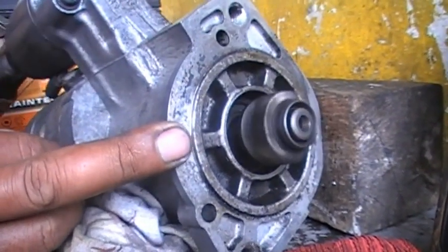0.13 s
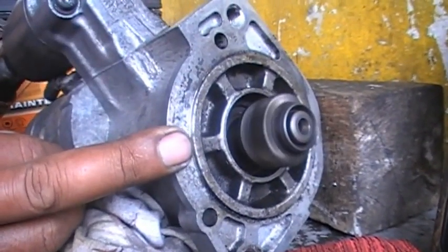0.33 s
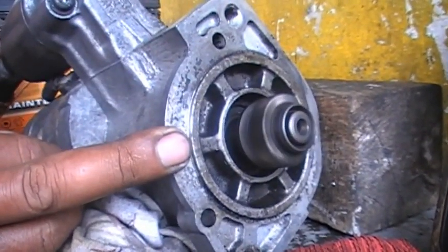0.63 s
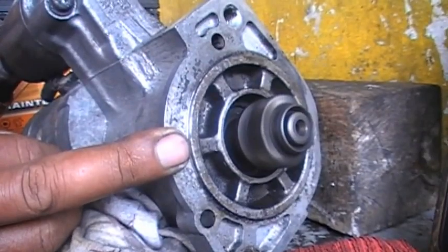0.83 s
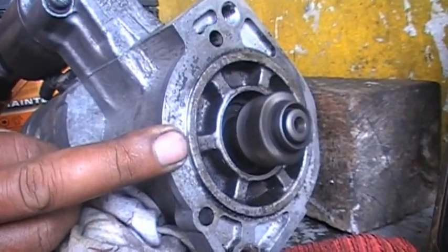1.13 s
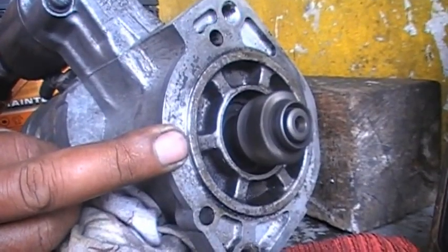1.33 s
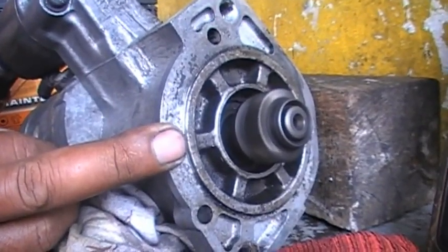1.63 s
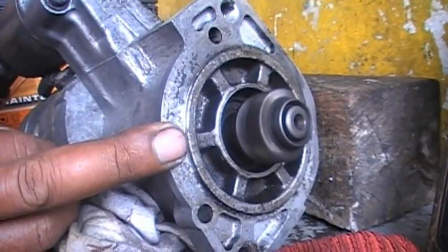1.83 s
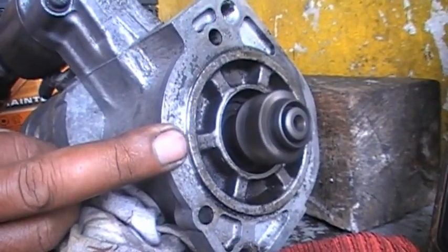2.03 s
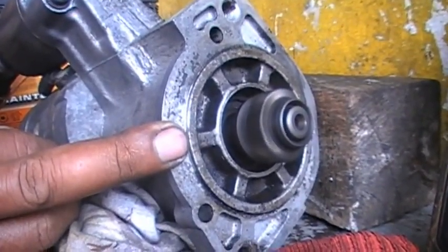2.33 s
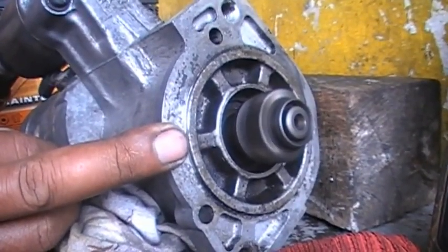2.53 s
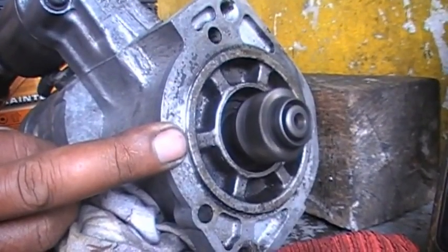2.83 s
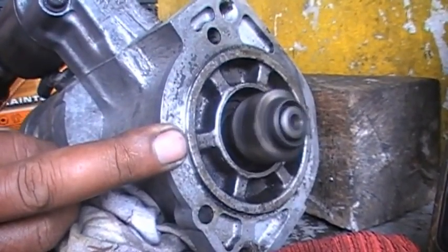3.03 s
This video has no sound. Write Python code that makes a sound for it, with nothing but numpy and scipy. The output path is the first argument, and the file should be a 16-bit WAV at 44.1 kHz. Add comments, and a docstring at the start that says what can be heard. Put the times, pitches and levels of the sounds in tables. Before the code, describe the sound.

An electric starter motor clacks into a loud, gritty whine and cuts out with a knock.

```python
"""A starter motor on a workbench. First the solenoid, an electromagnet, clunks the small drive gear out.
Then the motor spins up to a steady whine: tones from its shaft and ball bearings over the rush of
brushes and rolling balls. The shaft tones and the rush ring the cast metal housing. After about three
seconds the current is cut and the gear knocks back. Quiet workshop air lies under it all."""
import sys
import numpy as np
from scipy import signal
from scipy.fft import rfft, irfft, next_fast_len
from scipy.io import wavfile
from scipy.ndimage import uniform_filter1d, map_coordinates

SR = 44100
rng = np.random.default_rng(int(sys.argv[2]) if len(sys.argv) > 2 else 0)


def dump_mix(stems):
    """Bounce the given channels to the path in sys.argv[1] as a 16-bit WAV at rate SR."""
    frames = np.atleast_2d(stems).T  # one column per channel
    limited = np.clip(frames, -1, 1)  # hard clip at full scale
    pcm = np.round(limited * 32767).astype(np.int16)
    wavfile.write(sys.argv[1], SR, pcm)


N = 139797
T = np.arange(N) / SR


def motor():
    """One shaft speed drives the tones and the beat of the rush; all drop when the current is cut."""
    # How fast the shaft spins: time_s, speed_hz
    spin_up = [(0.12, 46.71), (0.14, 58.47), (0.16, 66.9), (0.18, 76.65), (0.19, 85.7), (0.21, 90.04),
               (0.29, 111.0), (0.32, 115.4), (0.41, 131.5), (0.5, 142.7), (0.6, 152.6), (0.72, 161.1),
               (0.9, 168.6), (1.11, 173.5), (1.53, 178.6), (1.98, 182.3), (2.48, 184.9), (3.1, 185.6)]
    # How strong the running noise is: time_s, level_db, extra_treble_db
    running = [(0.09, -34.5, 2.5), (0.12, -34.5, -4), (0.19, -21.5, -3), (0.3, -18.5, -0.5),
               (0.66, -18, 0.5), (0.69, -21, 0), (0.76, -18, 1), (1.67, -21, 0.5), (1.7, -22, 2.5),
               (1.8, -19, -0.5), (1.9, -21, 0), (1.91, -23, 3), (1.92, -19, 0.5), (2.28, -21, 2.5),
               (2.35, -17.5, 1), (2.41, -21, 3.5), (2.92, -20, 2), (2.96, -24, 2.5), (2.99, -20, 0.5),
               (3.04, -22.5, 3.5), (3.07, -18, 1)]
    cut_s, rush_drop_db, tone_drop_db = 3.102, -5.5, -15
    speed_hz = uniform_filter1d(curves(spin_up)[0], size=2000)
    shaft_turns = np.cumsum(speed_hz) / SR
    level_db, treble_db = curves(running)
    started, cut = window(0.049, 9, 0.02), window(cut_s, 9, 0.0046)
    tones = shaft_whine(shaft_turns, speed_hz.max(), level_db)
    tones += bearing_tones(shaft_turns, speed_hz) + low_hum(shaft_turns)
    dip_db = -5 * window(3.139, 3.153, 0.0043)  # a brief dip after the gear seats
    rush = brush_rush(shaft_turns, level_db - 4 + rush_drop_db * cut + dip_db, treble_db)
    return started * (rush + amp(tone_drop_db * cut) * tones)


def shaft_whine(shaft_turns, top_hz, running_db):
    """Tones at whole multiples of the shaft speed glide up through the housing's resonances."""
    # The shaft's tones, balanced as at full speed: cycles_per_turn, relative_db
    multiples = [(2, -16), (3, -16.5), (4, -1), (5, -4.5), (7, -12), (8, -11), (9, -11.5), (10, -8.5),
                 (15, -4), (16, -11), (19, -14), (20, -19), (21, -11.5), (22, -10.5), (23, -10), (24, -13),
                 (26, -21), (27, -5.5), (28, -4.5), (31, -8), (32, -10.5), (33, -7.5), (34, -10),
                 (36, -8.5), (39, -37), (40, -14), (41, -26.5), (42, -14)]
    whine = sum(amp(db - housing_db(k * top_hz)) * wavering_tone(round(k) * shaft_turns, waver_db=2.5)
                for k, db in multiples)
    whine = filtered(whine, lambda hz: amp(housing_db(hz)))
    settle_s = 1
    early_db = -7.5 * np.exp(-(T / settle_s) ** 2)  # softer until the speed settles
    return amp(-28.5 + early_db + running_db - np.median(running_db)) * whine


def bearing_tones(shaft_turns, speed_hz):
    """Tones come and go, pitched by the shaft and by the slower cage that holds the nine balls."""
    # How fast the ball cage circles: time_s, cage_turns_per_shaft_turn
    cage_share = [(.5, .388), (.8, .395), (1.4, .3978), (2.5, .3984)]
    # Passing tones: cage_multiple, shaft_multiple, level_db, start_s, end_s, fade_s
    passing = [(27, 0, -25, 0.896, 3.1, .02), (36, 0, -33.5, 0.64, 2.673, .2),
               (18, 0, -38, 0.711, 3.1, 0.086), (26, 0, -39, 1.633, 3.1, .2), (28, 0, -35, .9, 3.1, .1),
               (-18, 19, -37, .9, 3.1, .1), (45, 0, -58.5, .9, 3.49, .1), (-9, 9, -27, 0.84, 0.996, 0.034),
               (-18, 18, -34.5, 0.77, 2.197, 0.18), (-27, 24, -70, .9, 2.8, .1),
               (-27, 25, -34.5, 1.7, 2.97, 0.23), (-27, 26, -33, 0.68, 3.04, .1),
               (-27, 27, -48.5, 0.54, 3.1, .1), (-27, 28, -26.5, .48, 0.736, .05),
               (-27, 28, -44, 0.43, 3.1, .1), (0, 9, -28, .2, 0.61, 0.044), (0, 25, -26, 1.982, 3.15, 0.51),
               (0, 25, -36, 1.303, 2.1, 0.34), (-27, 28, -32, 0.13, 0.2, 0.022),
               (-27, 28, -33, .24, .48, 0.033), (-27, 27, -32.5, 0.441, 0.74, 0.058),
               (0, 9, -27.5, 0.246, .34, .03), (0, 27, -31.5, 0.44, 1.148, 0.076),
               (0, 24, -32, 0.682, .95, .05), (0, 21, -36, .45, .7, .05), (0, 9, -30, 0.185, 0.233, .02),
               (0, 8, -33, .38, 0.76, 0.057), (0, 11, -34, .3, 0.49, .05), (0, 9, -37, .75, 1.6, .1),
               (0, 7, -37, 0.53, 1.505, 0.11), (0, 22, -41.5, 0.77, 1.9, .2),
               (0, 26, -36.5, 0.79, 1.7, 0.21), (0, 28, -39, 0.33, 1.64, 0.16),
               (0, 15, -33.5, 0.58, 1.56, 0.11), (0, 1, -40, 0.676, 0.985, 0.14),
               (0, 1, -45, 0.95, 1.65, 0.5), (0, 1, -50, 2.376, 3.05, 0.09),
               (0, 3, -34.5, 0.44, 0.671, 0.054), (0, 4, -35.5, 0.373, 0.508, .03),
               (0, 2, -40, .44, .55, 0.016)]
    cage_turns = np.cumsum(speed_hz * curves(cage_share)[0]) / SR
    tones = np.zeros(N)
    for per_cage, per_shaft, db, start_s, end_s, fade_s in passing:
        turns = round(per_cage) * cage_turns + round(per_shaft) * shaft_turns
        tones += amp(db) * window(start_s, end_s, fade_s) * wavering_tone(turns)
    return tones


def low_hum(shaft_turns):
    """A faint, brief hum at two thirds of the shaft speed during the spin-up."""
    return amp(-46.5) * window(0.38, 0.6, 0.016) * wavering_tone(0.667 * shaft_turns)


def brush_rush(shaft_turns, level_db, treble_db):
    """Rubbing brushes and rolling balls make a gritty noise in the housing that pulses once a turn."""
    noise = rng.standard_normal((2, N))
    noise *= 1 + 0.17 * rng.exponential(size=N // 8 + 1).repeat(8)[:N]  # tiny grains
    # Random patches of time and pitch get a little louder or softer.
    spectrum = signal.stft(noise, nperseg=512)[2]
    patches = uniform_filter1d(rng.standard_normal(spectrum.shape[1:]), size=5, axis=0)
    patches = unit(uniform_filter1d(patches, size=6, axis=1))
    noise = signal.istft(spectrum * amp(1.5 * patches), nperseg=512)[1][:, :N]
    noise = filtered(spread(*noise), lambda hz: amp(housing_db(hz)))
    low = filtered(noise, lambda hz: 1 / (1 + (hz / 3000) ** 8))
    high = unit(noise - low)
    shake_s, bass_hz, early_bass_db = 0.34, 395, -7  # less bass until the bench starts to shake
    bass = filtered(low, lambda hz: 1 / (1 + (hz / bass_hz) ** 6))
    held_back = bass * (1 - amp(early_bass_db)) * window(-1, shake_s, 0.02)
    low = (low - held_back) / np.std(low)
    beat_db = 1.3 * np.sin(2 * np.pi * shaft_turns)
    swell_db = 0.78 * wobble(rate_hz=12)
    return amp(level_db + beat_db + swell_db) * (low + amp(treble_db) * high)


def housing_db(hz):
    """The cast housing rings more readily at some pitches than at others."""
    # Its broad tone colour: pitch_hz, gain_db
    colour = [(24, -72), (40, -38), (185, -44), (290, -33), (363, -9.5), (600, -11.5), (733, -6.5),
              (918, -4), (1090, -6.5), (1900, -9), (2260, -8), (2700, -12.5), (3380, -13), (5180, -6),
              (11300, -13.5), (13100, -28), (16000, -108)]
    # Its narrow peaks and dips: pitch_hz, width_hz, gain_db
    resonances = [(759, 133, 8.5), (903, 31, 6), (1107, 80, -4), (1532, 126, 4.5), (1720, 82, -5),
                  (1950, 470, 6.5), (2110, 80, -7.5), (2290, 89, -4), (2890, 100, -4), (2690, 314, 11.5),
                  (2890, 150, 4), (3470, 160, -5), (3890, 580, 4), (4420, 93, -1.5), (4650, 200, 3),
                  (4870, 100, -4.5), (5130, 200, 2), (6000, 125, 0.5), (6600, 77, 0.5), (8100, 150, -0.5),
                  (9000, 480, 2), (10200, 490, -1)]
    peaks_db = sum(db / (1 + (2 * (hz - centre) / width) ** 2) for centre, width, db in resonances)
    return along(colour, hz) + peaks_db


def knocks():
    """Each blow of the solenoid's plunger or the gear cracks, pings, thuds the bench and rings the steel."""
    # The blows: start_s, level_db, thud_relative_db, thud_hz, crack_length_s, ping_hz
    blows = [(.0332, -25, -14, 500, .003, 8000), (.087, -25, -20, 700, .002, 7000),
             (.0425, -13, 3, 480, .006, 10500), (.0475, -6, -6, 900, .004, 6000),
             (.0505, -16, 14, 420, .003, 2000), (.0533, -3, -14, 500, .003, 7300),
             (.063, -7, -5, 900, .006, 5800), (3.095, -13, 2, 430, .004, 4200),
             (3.099, -15, 0, 450, .003, 2700), (3.1333, -5, -15, 500, .0012, 1600),
             (3.135, -11, -10, 500, .004, 2450), (3.156, -18, -4, 1200, .012, 1600)]
    # The steel's ringing notes: pitch_hz, relative_db, ring_s (time to fade by 60 dB)
    steel = [(711, -22, .1), (1970, -28, .05), (2735, -28, .05), (4160, -28, .05), (4770, -24, .03),
             (5980, -30, .04), (9275, -34, .1), (9555, -32, .1), (10560, -34, .15), (10640, -33, .25)]
    # The crack's tone colour: pitch_hz, gain_db
    crack_colour = [(100, -20), (400, 14.5), (1500, 4.5), (6000, -1.5), (11000, 5), (15000, -20)]
    rise_s, low_cut_hz = 0.00026, 108
    rings, cracks = np.zeros((2, N + SR))
    t = np.arange(SR // 4) / SR

    def note(hz, db, ring_s):
        """One struck note that rises fast and dies away."""
        return amp(db - 60 * t / ring_s) * np.sin(2 * np.pi * hz * t) * (1 - np.exp(-t / rise_s))

    for start_s, db, thud_db, thud_hz, crack_s, ping_hz in blows:
        ring = sum(note(hz, level + rng.normal(0, 1.9), ring_s) for hz, level, ring_s in steel)
        ring += note(thud_hz, thud_db, ring_s=0.014) + note(ping_hz, db=0.5, ring_s=0.0083)
        span = slice(round(start_s * SR), round(start_s * SR) + len(t))
        rings[span] += amp(db) * ring
        cracks[span] += amp(db - 6.5 - 20 * (t / crack_s) ** 2) * rng.standard_normal(len(t))
    hits = rings[:N] + filtered(cracks[:N], lambda hz: amp(along(crack_colour, hz)))
    return filtered(hits, lambda hz: (1j * hz / (low_cut_hz + 1j * hz)) ** 2)


def room_echo(sound, ring_s=0.051):
    """The bench and walls throw back a short, blurred echo."""
    t = np.arange(SR // 4) / SR
    tail = rng.standard_normal((2, len(t))) * amp(-60 * t / ring_s)
    return signal.fftconvolve(sound[None], tail / np.linalg.norm(tail[0]), axes=1)[:, :N]


def workshop_air():
    """The steady, low hush of the workshop."""
    # Its tone colour: pitch_hz, gain_db
    colour = [(24, -37), (40, -4.5), (320, 11), (412, -18), (1020, 2.5), (1270, -8), (16000, -30)]
    noise = spread(*rng.standard_normal((2, N)))
    return unit(filtered(noise, lambda hz: amp(along(colour, hz))))


def wavering_tone(turns, waver_db=2):
    """A slightly rough tone, one cycle per turn, whose level wavers."""
    phase = turns + rng.random() + 0.05 * wobble(rate_hz=59.9)
    return np.sqrt(2) * amp(waver_db * wobble(rate_hz=20)) * np.sin(2 * np.pi * phase)


def spread(first, second):
    """Blends two unrelated noises into a left and a right that are partly alike."""
    # How alike the two sides are: pitch_hz, likeness (1 = the same)
    likeness = [(60, 0.83), (80, 0.73), (110, 0.72), (140, 0.86), (190, 0.99), (260, 0.91), (340, 0.98),
                (460, 0.96), (610, 0.86), (820, 0.97), (1100, 0.86), (1470, 0.89), (1960, 0.85), (2620, 1),
                (3510, 1), (4690, 0.88), (6270, 0.87), (8390, 0.55), (11200, 0.32), (15000, 1)]
    angle = lambda hz: np.arccos(np.clip(along(likeness, hz), -1, 1)) / 2
    middle = filtered(first, lambda hz: np.cos(angle(hz)))
    side = filtered(second, lambda hz: np.sin(angle(hz)))
    return np.array([middle + side, middle - side])


def amp(db):
    """Turns decibels into a multiplier."""
    return 10 ** (np.asarray(db) / 20)


def unit(x):
    """Scales a signal to an average power of 1."""
    return x / np.sqrt(np.mean(x ** 2) + 1e-20)


def along(points, hz):
    """Reads between (pitch_hz, value) points on a musical pitch scale."""
    pitches, values = np.transpose(points)
    return np.interp(np.log(hz + 1), np.log(pitches + 1), values)


def curves(rows):
    """One value per sample for each column after the time."""
    times, *columns = np.transpose(rows)
    return [np.interp(T, times, column) for column in columns]


def wobble(rate_hz):
    """A curve that slides to a new random value rate_hz times a second."""
    return map_coordinates(rng.standard_normal(int(N * rate_hz / SR) + 4), [T * rate_hz], order=1)


def filtered(x, response):
    """Multiplies each frequency in x by response(hz)."""
    size = next_fast_len(N + SR // 2)
    return irfft(rfft(x, size) * response(np.fft.rfftfreq(size, 1 / SR)), size)[..., :N]


def window(start_s, end_s, fade_s):
    """Fades in around the start and out around the end."""
    return np.clip(np.minimum(T - start_s, end_s - T) / max(fade_s, 1e-3) + 0.5, 0, 1)


def scene():
    """The motor, the knocks with their echo, and the quiet air."""
    hits, air = knocks(), workshop_air()
    return motor() + hits + amp(-13.5) * room_echo(hits) + amp(-49) * air


def record(dry):
    """Two microphone openings differ a little in level and timing; the highest treble is cut off."""
    # How much louder the left is than the right: pitch_hz, difference_db
    lean = [(60, 0.5), (76, 0.5), (97, 0.5), (120, 0.5), (160, 1.0), (200, 2), (250, 2), (320, -0.5),
            (410, 1.5), (520, 3.5), (660, 1), (840, 2.5), (1070, 2.0), (1360, -1.5), (1730, 0.5),
            (2200, 1.0), (2790, -0.5), (3550, 0.5), (4520, 0.0), (5740, -3), (7300, 1), (9280, 0.5),
            (11800, 0.5), (15000, 1.0)]
    # How far the left wave runs ahead of the right: pitch_hz, lead_radians
    lead = [(1000, 0), (1800, -0.41), (3000, 0.076), (6700, 0.26), (7400, 0.58), (9400, 0.93),
            (11000, 0.54), (15000, 0)]
    top_hz, half = 15870, np.array([[0.5], [-0.5]])  # each side takes half the difference
    sides = lambda hz: amp(half * along(lean, hz)) * np.exp(1j * half * along(lead, hz))
    return filtered(dry, lambda hz: sides(hz) * (hz < top_hz))


dry = scene()
out = record(dry)
dump_mix(out)
```